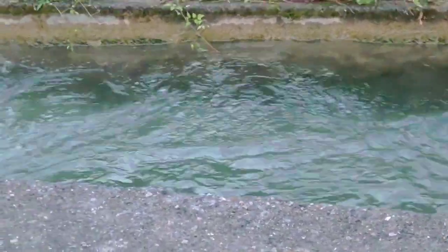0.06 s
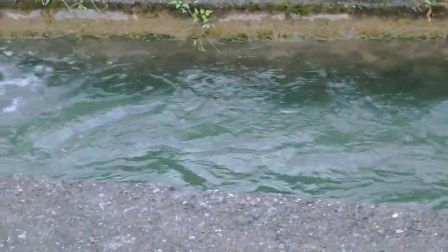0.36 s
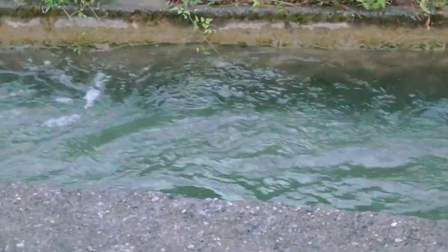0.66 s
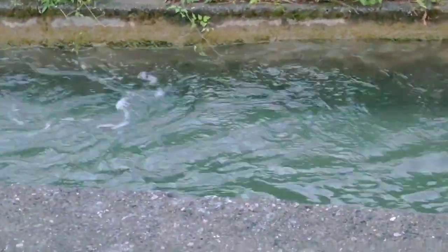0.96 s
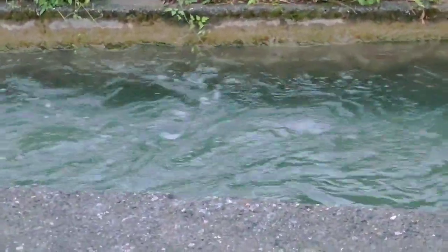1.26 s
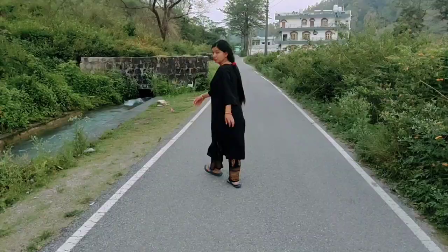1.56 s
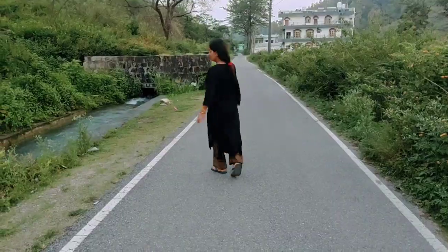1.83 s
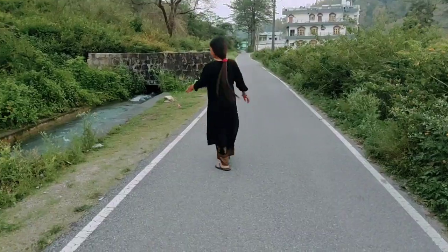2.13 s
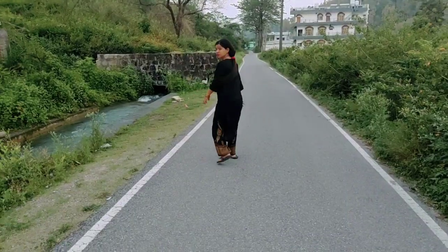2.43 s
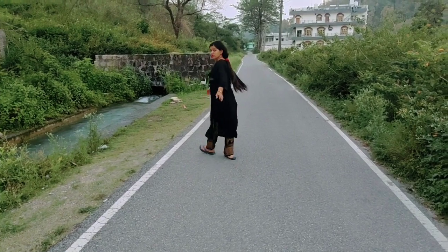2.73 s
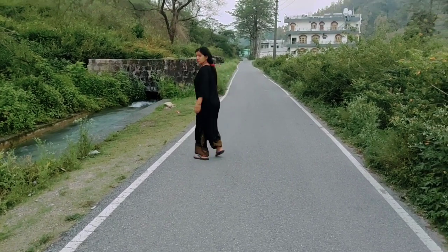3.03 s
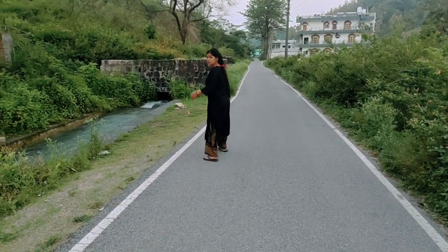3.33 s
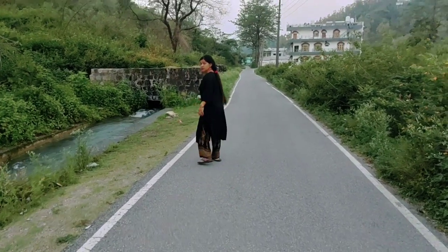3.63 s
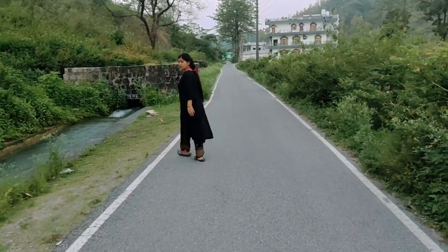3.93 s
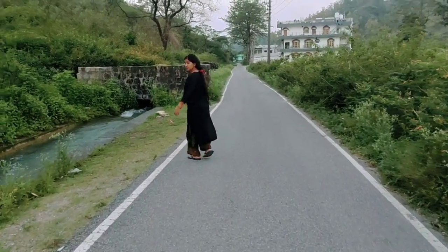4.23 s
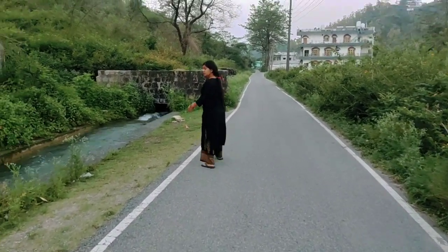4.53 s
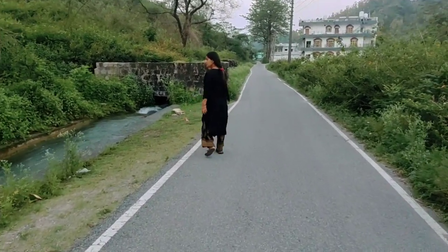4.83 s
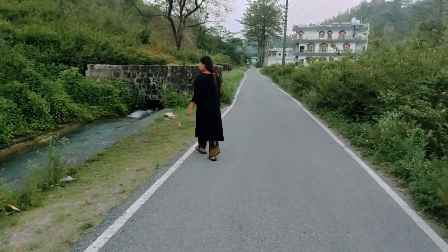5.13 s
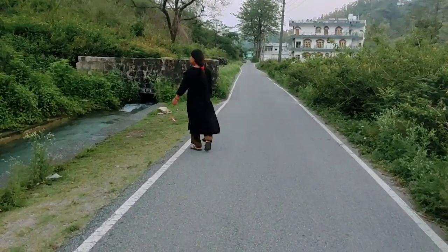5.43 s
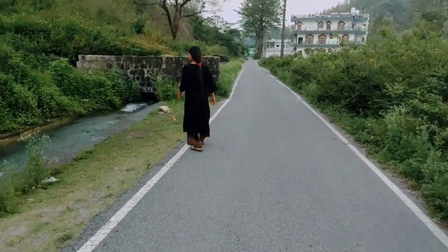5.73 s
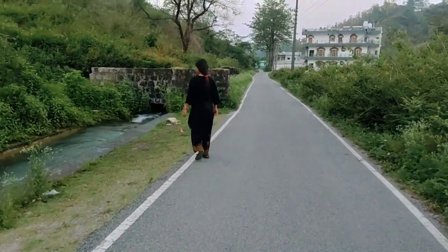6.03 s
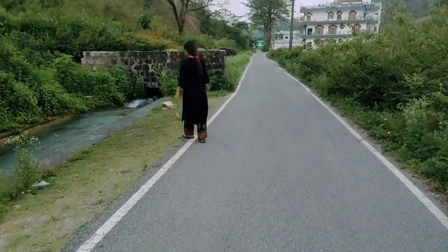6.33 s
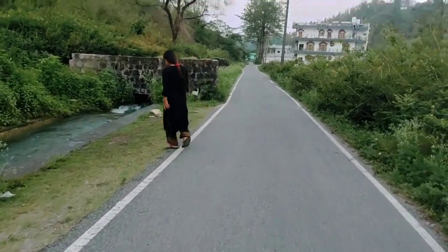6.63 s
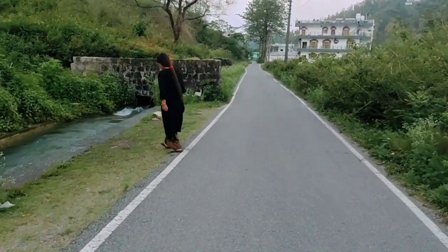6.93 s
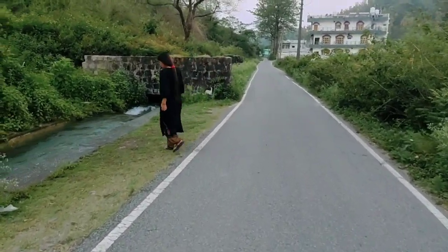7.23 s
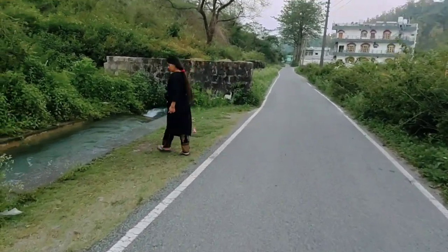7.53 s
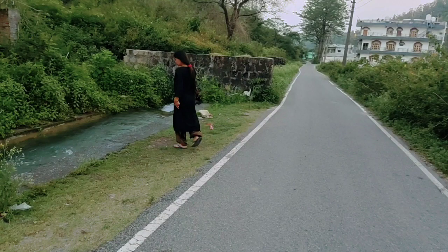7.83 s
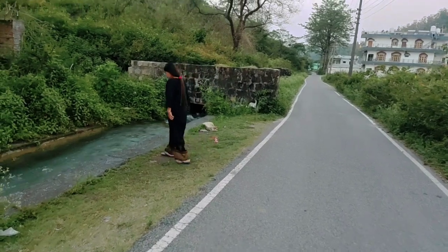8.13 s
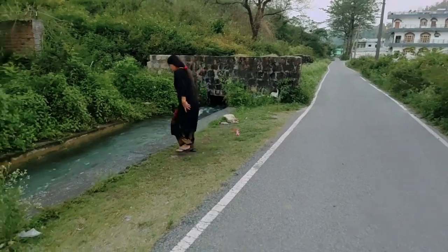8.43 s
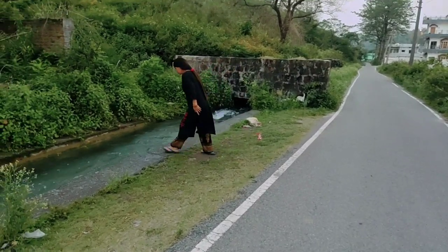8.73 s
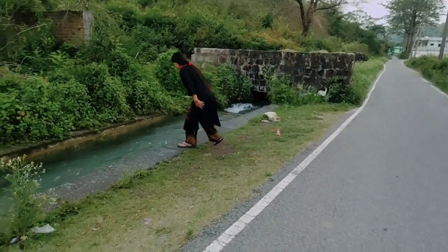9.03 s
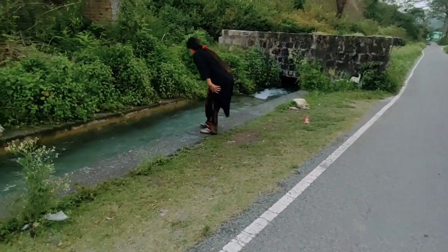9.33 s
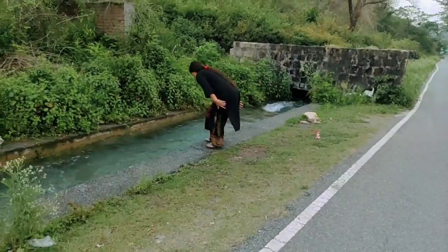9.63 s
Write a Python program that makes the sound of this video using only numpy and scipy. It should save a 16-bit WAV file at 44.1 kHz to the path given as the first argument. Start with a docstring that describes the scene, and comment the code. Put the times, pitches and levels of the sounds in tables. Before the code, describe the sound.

Outdoors, a small channel bubbles and splashes up close, with pinging droplets and a few bird calls. A half-second silence follows. The water comes back from farther away, pouring out of a culvert, briefly louder before settling into a soft, even flow. Over a thin, high insect hiss, small birds whistle, sing and chatter, and a cricket repeats rapid runs of chirps toward the right.

```python
"""A narrow concrete water channel, heard close from its edge and then, after a short silence, from the road
where it pours out of a culvert. Big bubbles gurgle, small ones splash and single drops ping. The water
reaches two closely spaced microphone openings, with a strong resonance near 5 kHz. Insects rub their
wings in the verges, one cricket chirps in double strokes, and small birds whistle, sing and chatter,
with a faint echo from the hillside."""
import sys
import numpy as np
from scipy import signal
from scipy.fft import rfft, irfft, next_fast_len
from scipy.io import wavfile
from scipy.ndimage import uniform_filter1d, map_coordinates

SR = 44100
rng = np.random.default_rng(int(sys.argv[2]) if len(sys.argv) > 2 else 0)


def put_to_file(sound):
    """Save the sound as 16-bit audio at rate SR, in the file named by the first command-line argument."""
    columns = np.atleast_2d(sound).T  # one column per channel
    safe = np.clip(columns, -1, 1)
    whole_steps = np.round(safe * 32767)
    wavfile.write(sys.argv[1], SR, whole_steps.astype(np.int16))


N = 426006
AT_EDGE, ON_ROAD = (-1, 1.558), (2.012, 11)  # when each place is heard: start_s, end_s


def amp(db):
    """Turn decibels into a number to multiply by."""
    return 10 ** (np.asarray(db) / 20)

def unit(x):
    """Scale a sound to an average power of 1."""
    return x / np.sqrt(np.mean(x ** 2) + 1e-20)

def at_pitch(rows, hz):
    """Look up a table's other columns at any pitch, blending between rows."""
    pitches, *columns = np.transpose(rows)
    return [np.interp(np.log(hz + 1), np.log(pitches + 1), c) for c in columns]

def over_time(rows):
    """Join a table's timed points with straight lines, one value per sample."""
    times, *columns = np.transpose(rows)
    return [np.interp(np.arange(N) / SR, times, c) for c in columns]

def wobble(per_s, size=N):
    """A smooth curve through per_s random values a second."""
    points = rng.standard_normal(int(size * per_s / SR) + 4)
    return map_coordinates(points, [np.arange(size) * per_s / SR])

def filtered(x, response):
    """Make each pitch louder, softer or later, as response(hz) says."""
    size = next_fast_len(N + SR // 4)
    return irfft(rfft(x, size) * response(np.fft.rfftfreq(size, 1 / SR)), size)[..., :N]

def sides(left_db):
    """Left and right gains, with the left louder by left_db."""
    gains = amp([np.atleast_1d(left_db) / 2, -np.atleast_1d(left_db) / 2])
    return gains / np.sqrt(np.mean(gains ** 2, axis=0))

def add(track, start_s, sound):
    """Mix a sound into a track."""
    part = track[..., max(0, round(start_s * SR)):][..., :sound.shape[-1]]
    part += sound[..., :part.shape[-1]]

def tone(hz):
    """A pure tone that follows a changing pitch."""
    return np.sin(2 * np.pi * np.cumsum(hz) / SR)

def during(span):
    """1 inside a span of time, 0 outside."""
    t = np.arange(N) / SR
    return (t > span[0]) & (t < span[1])

def bubbles(per_s, low_hz, high_hz, cycles, spread_db, size):
    """Random bubbles ring and fade, rising in pitch as they near the surface."""
    when, pitch, length, loudness = rng.random((4, int(per_s * N / SR), 1))
    hz = low_hz * (high_hz / low_hz) ** pitch
    life_s = cycles * (.5 + length) / hz
    strength = amp(spread_db * np.minimum(-np.log(1 - loudness), 3)) * hz
    t = np.arange(size) / SR
    age = t / life_s
    fade = np.exp(-age) * (1 - np.exp(-8 * age))
    rise = 1 + .03 * np.minimum(age, 4)
    rings = strength * fade * np.sin(2 * np.pi * hz * t * rise)
    samples = (when * N).astype(int) + np.arange(size)
    return unit(np.bincount(samples.ravel(), rings.ravel(), N)[:N])

def bubbly_rush(make_bubbles, bubble_db, colour, stereo):
    """Bubbles over a hiss: one part reaches both sides out of step, and each side has a part of its own."""
    rush = rng.standard_normal((3, N)) + amp(bubble_db) * np.array([make_bubbles() for _ in range(3)])
    def paths(hz):
        likeness, left_db, lead = at_pitch(stereo, hz)
        gain = amp(at_pitch(colour, hz)[0]) * sides(left_db)
        shared = gain * np.sqrt(likeness) * np.exp(.5j * np.array([-lead, lead]))
        separate = gain * np.sqrt(1 - likeness)
        return shared, separate
    return filtered(rush[0], lambda hz: paths(hz)[0]) + filtered(rush[1:], lambda hz: paths(hz)[1])

def water(flow, gurgle, splash, surge_db, flutter_db):
    """Gurgle below 1300 Hz and splash above it; both surge with the current."""
    lows = lambda hz: 1 / np.sqrt(1 + (hz / 1300) ** 8)
    highs = lambda hz: np.sqrt(1 - lows(hz) ** 2)
    gurgle_db, splash_db = over_time(flow)
    gurgle_gain = amp(gurgle_db + .4 * wobble(9.8))
    splash_gain = amp(splash_db + surge_db * wobble(12) + flutter_db * wobble(90))
    return unit(filtered(gurgle, lows)) * gurgle_gain + unit(filtered(splash, highs)) * splash_gain

# How strong the water is at each pitch: pitch_hz, relative_db
EDGE_GURGLE = [(25, -19), (60, -12.5), (110, -4.5), (180, -4.5), (260, -5), (380, -1), (480, -3.5),
               (620, -4), (820, -4), (1050, -10), (1350, -9), (2000, -8)]
EDGE_SPLASH = [(1000, -8), (1450, -22), (2000, -14.5), (2700, -13.5), (3200, -16), (3750, -17),
               (4300, -11.5), (4800, -1), (5500, -8), (6500, -19.5), (7900, -36.5), (10800, -33.5),
               (11900, -30.5), (15400, -39.5)]
# How the two sides compare: pitch_hz, likeness (0-1), left_db, right_lead_radians
EDGE_STEREO = [(130, .96, 0, .3), (300, .8, -.6, .8), (430, .56, 0, 1.4), (680, .85, 0, 2.9),
               (870, .72, -2, 3.15), (1350, .88, -1, 3.4), (1700, .58, 2.5, 4.3), (2050, .52, -3, 5.7),
               (3500, .5, -9.5, 6.1), (4900, .9, -14, 6.8), (6000, .75, -12.5, 7.7), (7500, .2, -3, 9.3),
               (15000, .05, -2, 9.4)]
# How loud the water is: time_s, gurgle_db, splash_db
EDGE_FLOW = [(0, -43.5, -34.5), (.95, -43.5, -35), (1.3, -42.5, -36)]
def channel_edge():
    """Ripples break against the concrete close by, with a crisp crackle."""
    big = lambda: bubbles(150, 180.3, 1395, cycles=5.9, spread_db=2, size=2400)
    small = lambda: unit(bubbles(1400, 2530, 7500, cycles=4.3, spread_db=3, size=200)
                         + .37 * bubbles(130, 1400, 4200, cycles=11, spread_db=8, size=1200))
    gurgle = bubbly_rush(big, -16, EDGE_GURGLE, EDGE_STEREO)
    splash = bubbly_rush(small, -8.5, EDGE_SPLASH, EDGE_STEREO)
    return water(EDGE_FLOW, gurgle, splash, surge_db=.4, flutter_db=.44) * during(AT_EDGE)

def wing_hiss(pitch_hz, width_hz):
    """A narrow hiss around the pitch at which a wing rings."""
    noise = rng.standard_normal((2, N))
    return unit(filtered(noise, lambda hz: 1 / (1 + (2 * (hz - pitch_hz) / width_hz) ** 2)))

def insect_chorus():
    """Many distant insects merge into two trembling hisses."""
    low = wing_hiss(4750, 350) * amp(3.5 * wobble(60)) * sides(-9.5)
    high = wing_hiss(11900, 300) * amp(2 * wobble(7)) * sides(-10)
    return low * (amp(-46) * during(AT_EDGE) + amp(-55.5) * during(ON_ROAD)) + amp(-65) * high

# Single loud drops: start_s, pitch_hz, level_db, left_db
DROPS = [(.077, 4800, -26, -12), (.141, 5020, -18.5, -14), (.369, 5000, -21, -13), (.379, 4680, -18, -11),
         (.478, 2220, -34.5, -5.5), (.546, 4920, -19, -15), (2.611, 2450, -34.5, -2), (7.358, 2230, -35, 0),
         (9.127, 4930, -31, -5)]
def drops(ring_cycles=65, splat_s=.013):
    """Each drop lands with a splat and a ping; lower ones ring longer."""
    out, t = np.zeros((2, N)), np.arange(SR // 10) / SR
    for start_s, hz, db, left_db in DROPS:
        fade = amp(-60 * t * hz / ring_cycles) * (1 - np.exp(-t / .0002))
        ping = fade * np.sin(2 * np.pi * hz * t)
        soft_noise = unit(uniform_filter1d(rng.standard_normal(len(t)), size=5))
        splat = amp(-22.5 - 60 * t / splat_s) * soft_noise
        add(out, start_s, amp(db) * (ping + splat) * sides(left_db))
    return out

def bird_note(hz, db, left_db, roughness=0):
    """A note swells and fades; fast shaking of its pitch and level makes it rough."""
    quaver = np.interp(roughness, [0, 1], [.006, .05]) * wobble(200, len(hz))
    shimmer_db = np.interp(roughness, [0, 1], [1.8, 4]) * wobble(55, len(hz))
    swell = np.sin(np.linspace(0, np.pi, len(hz))) ** .7
    return amp(db + shimmer_db) * np.sqrt(2) * swell * tone(hz * (1 + quaver)) * sides(left_db)

# Curving bird calls: start_s, length_s, start_hz, turn_hz, end_hz, turn_place (0-1),
# relative_db, growth_db, left_db, roughness (0-1), flutter_db
WHISTLES = [(0.181, 0.11, 2880, 2700, 3020, .37, -39, 6, -11, 0, -3),
            (0.699, .095, 6300, 6600, 4020, 0.13, -39.5, 16, -15, 0.46, -4),
            (0.905, .092, 6120, 6100, 3920, 0, -38.5, 10, -8, 0.6, -2),
            (2.084, 0.13, 3230, 3475, 3330, 0.64, -42, 6, -9.5, 0, 1),
            (2.312, 0.29, 4330, 4690, 2300, .34, -51, -13, -5, .05, 5),
            (5.402, 0.11, 3420, 3620, 3320, 0.46, -47, 0, 4, 0, 0),
            (5.974, 0.054, 2560, 2750, 2500, 0.56, -31.5, -1, 5, 0.16, 1.5),
            (6, 0.29, 1830, 1923, 1864, 0.52, -50.5, 6, 7, 0.11, 2.5)]
def bird_whistles(flutter_hz=16):
    """Each whistle bends to a turning pitch and away again while its level flutters."""
    out = np.zeros((2, N))
    for start_s, length_s, start_hz, turn_hz, end_hz, turn_place, *voice in WHISTLES:
        db, growth_db, left_db, roughness, flutter_db = voice
        t = np.arange(int(length_s * SR)) / SR
        from_turn = np.interp(t / length_s, [0, np.clip(turn_place, .05, .95), 1], [-1, 0, 1])
        outer_hz = np.where(from_turn < 0, start_hz, end_hz)
        hz = turn_hz + (outer_hz - turn_hz) * np.abs(from_turn) ** 1.8
        note_db = db + growth_db * (t / length_s - .5) - flutter_db * np.cos(2 * np.pi * flutter_hz * t)
        add(out, start_s, bird_note(hz, note_db, left_db, roughness))
    return out

# How long the echo takes to fall by 60 dB: pitch_hz, fade_s
ECHO_FADES = [(500, .3), (3000, .3), (12000, .12)]
def hillside_echo(sound, rise_s=.015):
    """Bushes and slope scatter a blurred echo that builds softly and soon dies."""
    hz, t, noise = signal.stft(rng.standard_normal((2, SR // 2)), SR, nperseg=256)
    fade_s = at_pitch(ECHO_FADES, hz)[0][:, None]
    shape = (1 - np.exp(-t / rise_s)) * amp(-60 * t / fade_s)
    tail = signal.istft(noise * shape, SR, nperseg=256)[1]
    return signal.fftconvolve(sound, tail / np.linalg.norm(tail[0]), axes=1)[:, :N]

# How strong the water is at each pitch: pitch_hz, relative_db
ROAD_GURGLE = [(25, -19), (60, -13.5), (110, -5.5), (180, -4), (260, -1), (380, -0.5), (480, -2.5),
               (620, -1.5), (820, -3.0), (1050, -10), (1350, -9.5), (2000, -6)]
ROAD_SPLASH = [(1000, -29), (1450, -12), (2000, -7.5), (2700, -4), (3200, -8), (3750, -12.5), (4300, -7.5),
               (4800, 0.5), (5500, -6.5), (6500, -10), (7900, -26), (10800, -25), (11900, -19),
               (15400, -18.5)]
# How the two sides compare: pitch_hz, likeness (0-1), left_db, right_lead_radians
ROAD_STEREO = [(30, .85, -1, 0), (150, .97, .7, -.1), (350, .84, 2, -.8), (550, .84, 3.6, -1.5),
               (900, .42, 2.7, -1.7), (1350, .82, 1.2, -3.1), (1850, .5, -1.5, -3.5), (2100, .25, -4, -5),
               (2350, .7, -2.5, -6.2), (3000, .68, -3.2, -6.8), (3650, .15, -3.5, -6.8),
               (4700, .58, -3.5, -6), (5500, .35, -8, -4.6), (7500, .4, -.5, -3.1), (12000, .1, -3, 0)]
# How loud the water is: time_s, gurgle_db, splash_db
ROAD_FLOW = [(2.75, -47, -42), (4.2, -46.5, -41), (5.2, -47.5, -43), (6.5, -47, -43), (9.66, -46.5, -43)]
def culvert():
    """From the road, the water pouring out blends into a smoother rush."""
    big = lambda: bubbles(180, 201.8, 1400, cycles=6.2, spread_db=2.5, size=2400)
    small = lambda: unit(bubbles(700, 2000, 14200, cycles=2.4, spread_db=2.5, size=200)
                         + .49 * bubbles(220, 1404, 4025, cycles=9.1, spread_db=3, size=1200))
    gurgle = bubbly_rush(big, -15, ROAD_GURGLE, ROAD_STEREO)
    splash = bubbly_rush(small, -9, ROAD_SPLASH, ROAD_STEREO)
    return water(ROAD_FLOW, gurgle, splash, surge_db=.7, flutter_db=.86) * during(ON_ROAD)

def thump(pitch_hz=55.5, fade_s=.17):
    """One soft low thump as the road is first heard."""
    out, t = np.zeros(N), np.arange(SR // 4) / SR
    add(out, ON_ROAD[0], amp(-42 - 60 * t / fade_s) * np.sin(2 * np.pi * pitch_hz * t))
    return out

# Very high rasps: start_s, length_s, level_db
RASPS = [(2.326, 0.044, -56), (2.389, 0.013, -52), (7.157, .06, -44.5)]
def bush_cricket(fade_db=12):
    """A row of tiny teeth scrapes and makes the wing ring, in short fading rasps."""
    swell = np.zeros(N)
    for start_s, length_s, db in RASPS:
        from_middle = np.linspace(-.5, .5, int(length_s * SR))
        add(swell, start_s, amp(db - fade_db * from_middle) * signal.windows.tukey(len(from_middle), .3))
    return swell * (wing_hiss(12000, 230) + .35 * wing_hiss(11400, 200)) * sides(-15)

# Runs of chirps: start_s, chirp_count, spacing_s, first_gap_shorter_s, first_db, last_db, left_db
CHIRP_RUNS = [(3.081, 8, .1350, 0, -41, -40.5, -5), (4.869, 7, .1344, .006, -39, -35, -4),
              (6.412, 9, .1376, 0, -34, -33, -11), (8.2915, 9, .1358, .017, -31, -36.5, -14)]
def cricket(stroke_s=.009, reopen_s=.0177, boost_db=1, swell_db=1.2):
    """A chirp is two wing strokes, closing and reopening; each falls in pitch as the wing slows."""
    out, size = np.zeros((2, N)), int(stroke_s * SR)
    falling_hz = np.linspace(5400, 4620, size)
    shape = np.sin(np.linspace(0, np.pi, size))
    stroke = lambda db: amp(db + rng.normal(0, .69)) * shape * tone(falling_hz * rng.normal(1, .005))
    for start_s, count, spacing_s, early_s, first_db, last_db, left_db in CHIRP_RUNS:
        for k, progress in enumerate(np.linspace(0, 1, round(count))):
            chirp_s = start_s + k * spacing_s - early_s * (k > 0)
            db = boost_db + first_db + (last_db - first_db) * progress + swell_db * np.sin(np.pi * progress)
            add(out, chirp_s, stroke(db) * sides(left_db))
            add(out, chirp_s + reopen_s, stroke(db + .4) * sides(left_db))
    return out

# The notes of a falling song: start_s, pitch_hz, relative_db
SONG_NOTES = [(3.212, 5700, -41), (3.322, 5220, -43), (3.495, 4760, -44.5), (3.568, 4450, -38),
              (3.66, 4070, -43), (3.745, 3790, -51)]
def falling_song():
    """One bird sings downward slides, each lower and longer than the last."""
    out = np.zeros((2, N))
    for k, (start_s, hz, db) in enumerate(SONG_NOTES):
        length_s = .052 + k * .005
        slide_hz = np.geomspace(hz * 1.03, hz * .97, int(length_s * SR))
        add(out, start_s, bird_note(slide_hz, db, left_db=-12))
    return out

# Big single bubbles: start_s, pitch_hz, level_db
GLUGS = [(3.933, 278, -34), (8.96, 343, -33.5)]
def glugs(attack_s=.0044, fade_s=.077, rise_per_s=1.9):
    """Big air pockets collapse under the pouring water, each with a short rising note."""
    out, t = np.zeros(N), np.arange(SR // 8) / SR
    for start_s, hz, db in GLUGS:
        shape = amp(db - 60 * t / fade_s) * (1 - np.exp(-t / attack_s))
        add(out, start_s, shape * tone(hz * (1 + rise_per_s * t)))
    return out

# Sliding bird calls: start_s, length_s, start_hz, end_hz, relative_db, left_db
SLIDES = [(3.992, 0.12, 4280, 5030, -43, -7), (4.326, .03, 4580, 4300, -41, -7),
          (4.359, 0.025, 4230, 4080, -38, -13), (4.562, 0.065, 4400, 3980, -44, -5),
          (4.775, 0.06, 4100, 3900, -44, -2), (5.803, 0.031, 2460, 2500, -40.5, 7),
          (5.84, 0.019, 2560, 2610, -36.5, 7), (7.766, 0.026, 2200, 1880, -41.5, 4)]
def bird_slides():
    """Short calls slide straight up or down in pitch."""
    out = np.zeros((2, N))
    for start_s, length_s, start_hz, end_hz, db, left_db in SLIDES:
        add(out, start_s, bird_note(np.geomspace(start_hz, end_hz, int(length_s * SR)), db, left_db))
    return out

# Harsh bird notes: start_s, length_s, pitch_hz, relative_db
CHATTER = [(4.717, 0.07, 2450, -43), (4.734, 0.03, 2710, -45), (4.865, 0.065, 2380, -47),
           (7.958, 0.028, 2630, -46), (7.994, 0.044, 2540, -41), (8.046, .022, 2510, -47),
           (8.128, 0.027, 2700, -45), (8.215, 0.034, 2450, -47)]
def bird_chatter():
    """A distant bird chatters in short, rough notes."""
    out = np.zeros((2, N))
    for start_s, length_s, hz, db in CHATTER:
        add(out, start_s, bird_note(np.full(int(length_s * SR), hz), db, left_db=0, roughness=.91))
    return out

def scene():
    """Water, insects and birds in the open air."""
    stream = channel_edge() + drops() + culvert() + thump() + glugs()
    birds = bird_whistles() + falling_song() + bird_slides() + bird_chatter()
    crickets = bush_cricket() + cricket()
    echo = hillside_echo(amp(-16.5) * birds + amp(-16) * crickets)
    return stream + insect_chorus() + amp(-4) * birds + crickets + echo

def record(dry):
    """Silence parts the two places, the road starts louder above the bass, and the top treble is cut."""
    bass_hz, top_hz = 115, 15550
    boost_db, = over_time([(2.69, 8), (2.74, 0)])  # time_s, boost_db
    above_bass = filtered(dry, lambda hz: hz ** 2 / (hz ** 2 + bass_hz ** 2))
    road = dry + (amp(boost_db) - 1) * above_bass
    sound = dry * during(AT_EDGE) + road * during(ON_ROAD)
    return filtered(sound, lambda hz: np.clip((top_hz - hz) / 200 + .5, 0, 1))


dry = scene()
out = record(dry)
put_to_file(out)
```